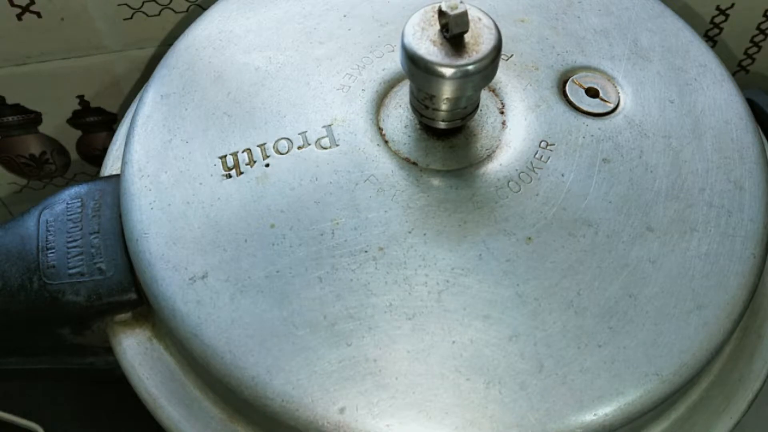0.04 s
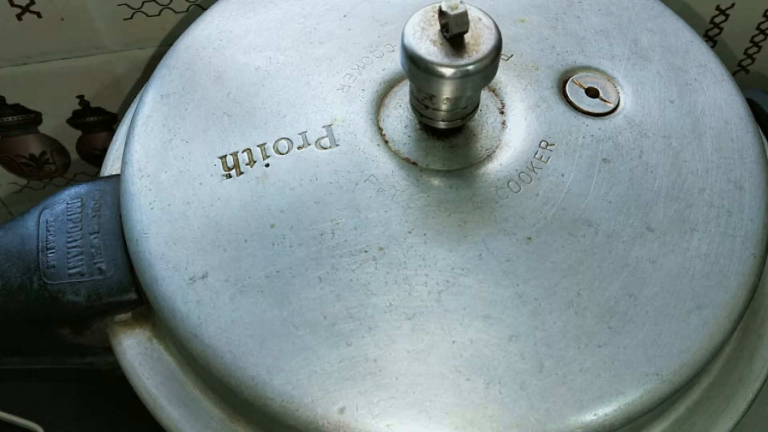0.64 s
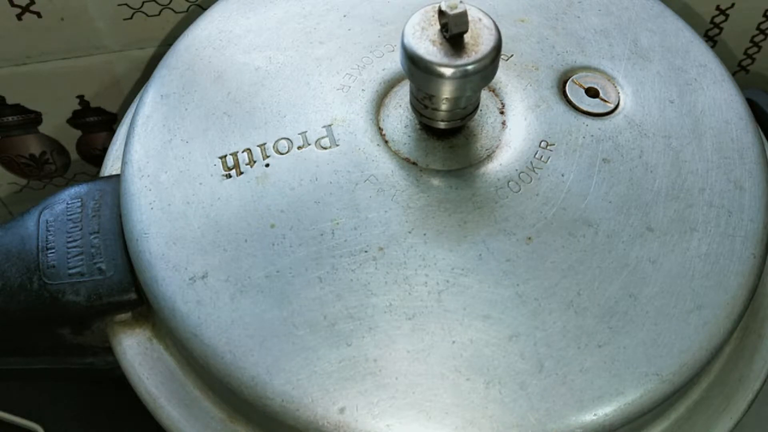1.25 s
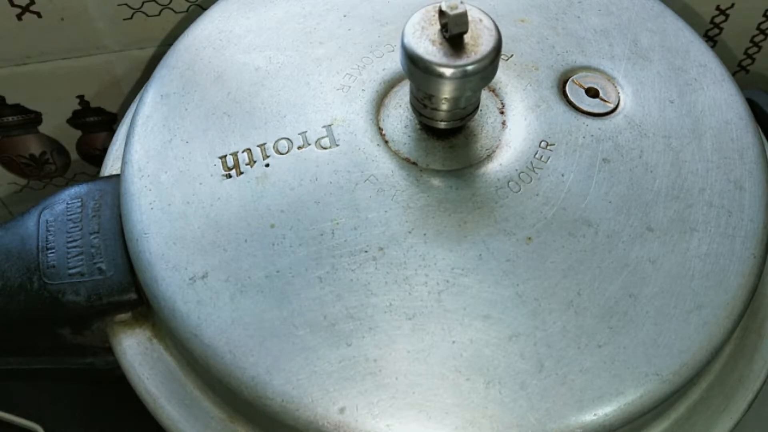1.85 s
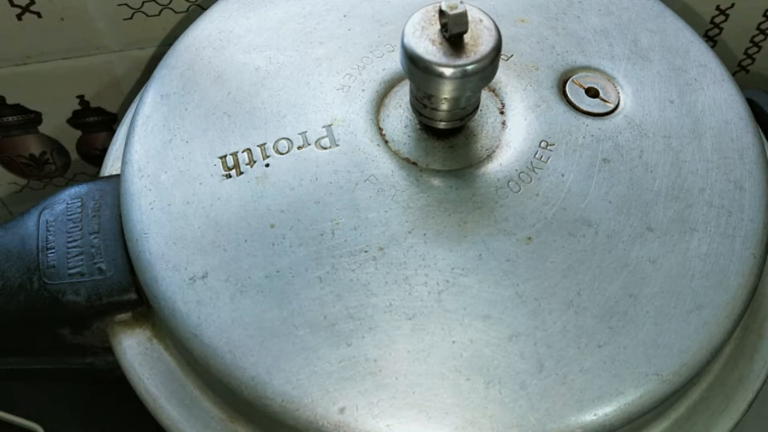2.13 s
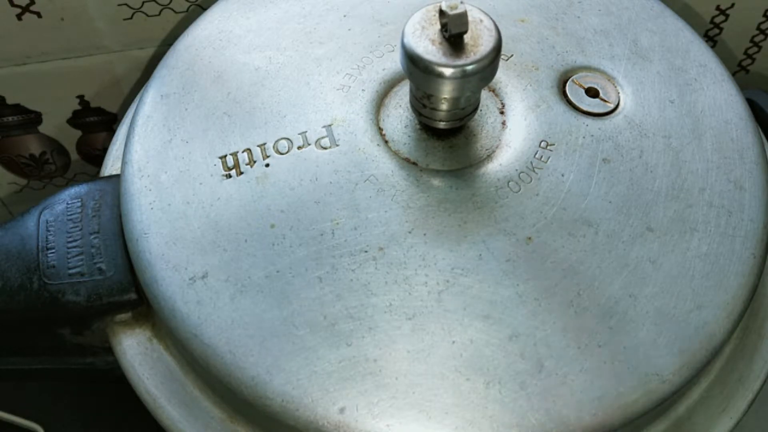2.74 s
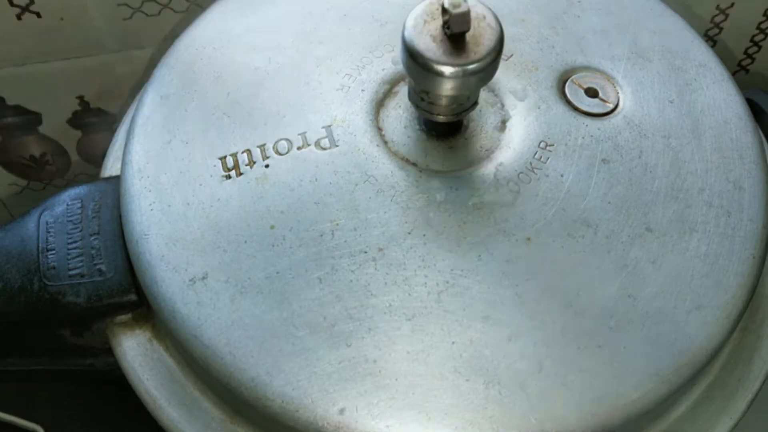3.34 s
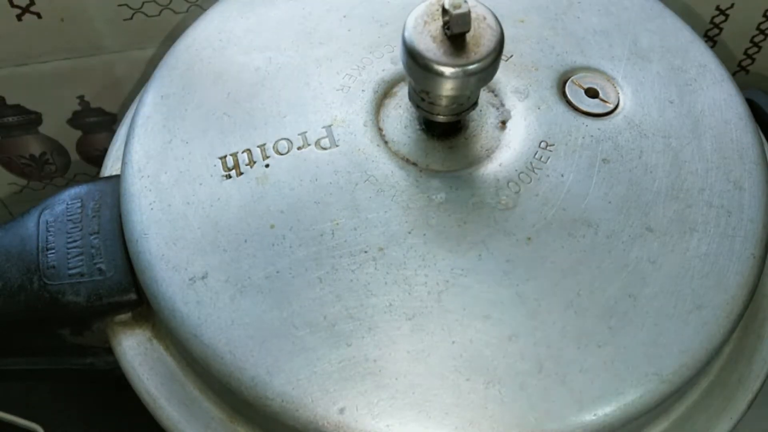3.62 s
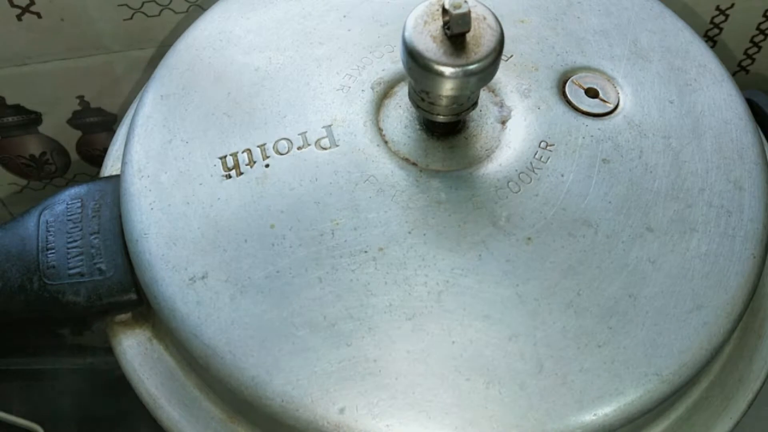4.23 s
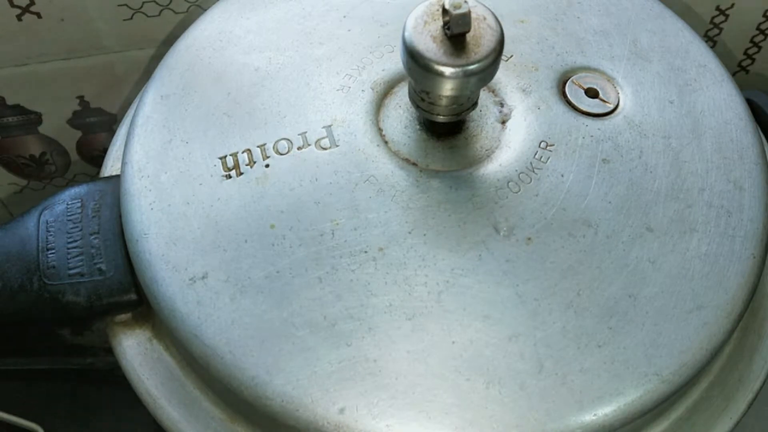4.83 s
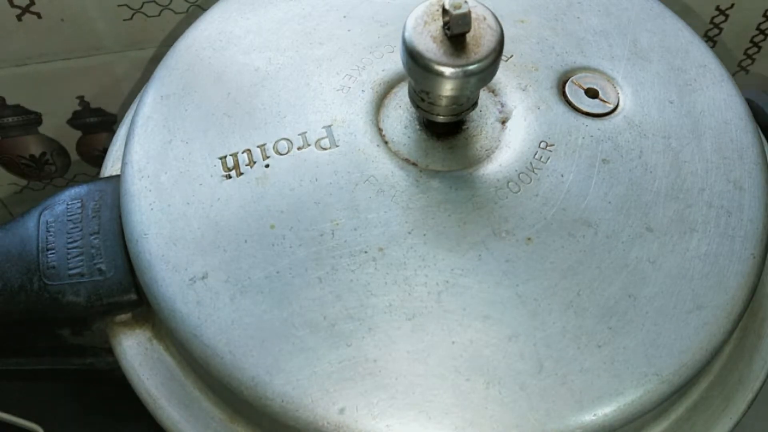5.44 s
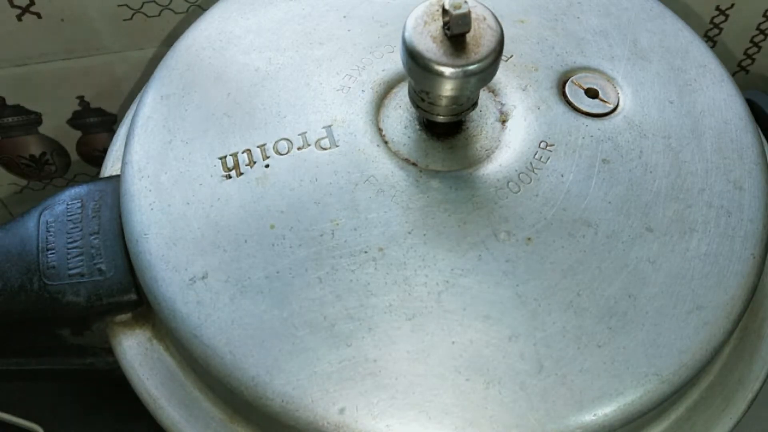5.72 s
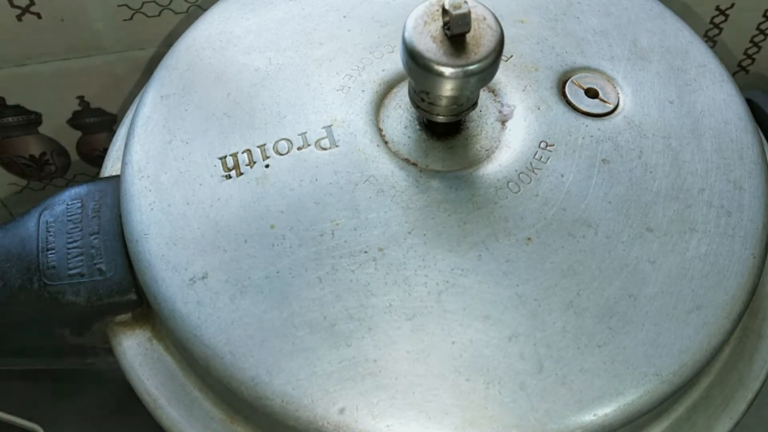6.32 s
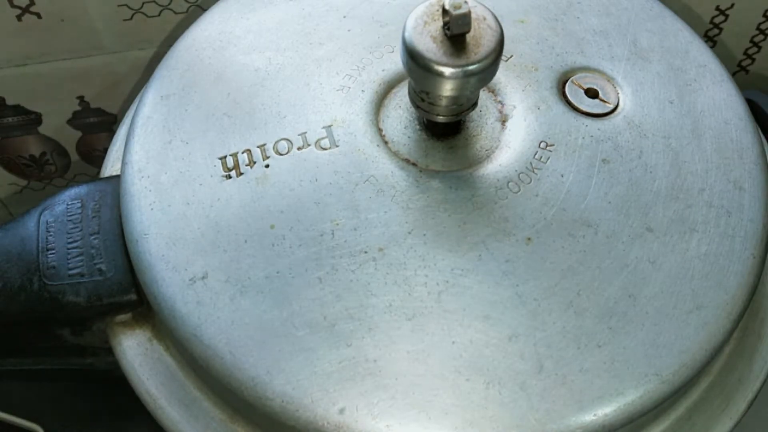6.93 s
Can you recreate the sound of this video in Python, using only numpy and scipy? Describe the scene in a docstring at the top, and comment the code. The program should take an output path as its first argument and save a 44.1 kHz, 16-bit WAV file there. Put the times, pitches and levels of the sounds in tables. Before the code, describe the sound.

A pressure cooker hisses thinly and sputters, then blasts a loud, steady jet of steam that buffets the microphone.

```python
"""A thin, spurting hiss that jumps to a loud, steady jet: a pressure cooker, heard from just above its lid.
Steam seeps from under the rocking weight valve and sputters through water at the seat; then the weight
lifts and the jet blows out through the resonances of valve and lid. The blast buffets the two
microphone ports, which pop one at a time. A small kitchen reflects the hiss; the stove rumbles faintly."""
import sys
import numpy as np
from scipy import signal
from scipy.fft import rfft, irfft
from scipy.io import wavfile
from scipy.ndimage import uniform_filter1d

SR = 44100
rng = np.random.default_rng(int(sys.argv[2]) if len(sys.argv) > 2 else 0)


def unload_wav(signal):
    """Save mono or channel-first audio to the path in sys.argv[1] as 16-bit WAV at rate SR, clipped to [-1, 1]."""
    wavfile.write(
        sys.argv[1],
        SR,
        np.round(np.clip(np.atleast_2d(signal).T, -1, 1) * 32767).astype(np.int16),
    )


N = 316197
T = np.arange(N) / SR
HZ = np.fft.rfftfreq(N, 1 / SR)
LIFT_S = 3.3768  # the weight leaves its seat
TOP_HZ = 15760


def gain_of(db):
    """Decibels to amplitude."""
    return 10 ** (np.asarray(db) / 20)


def unit_rms(x):
    """Scales to rms 1."""
    return x / np.sqrt(np.mean(x ** 2) + 1e-20)


def curve(points):
    """An EQ curve in dB: joins rows (f/Hz, level/dB) on a log-frequency axis."""
    hz, db = np.transpose(points)
    return np.interp(np.log(HZ + 1), np.log(hz + 1), db)


def bells(rings):
    """Resonances as a bell EQ in dB, from rows (f/Hz, width/Hz, gain/dB)."""
    return sum(db / (1 + (2 * (HZ - hz) / width) ** 2) for hz, width, db in rings)


def noise(colour_db):
    """Noise of rms 1 with the given spectrum."""
    return unit_rms(irfft(rfft(rng.standard_normal(N)) * gain_of(colour_db), N))


def wander(rate_hz, hop=64):
    """Random modulation of rms 1, from about 2 Hz up to the given rate."""
    t = T[::hop]
    hz = np.fft.rfftfreq(len(t), hop / SR) + 1e-3
    rolloff = np.sqrt((1 + (hz / rate_hz) ** 4) * (1 + (2 / hz) ** 4))
    slow = irfft(rfft(rng.standard_normal(len(t))) / rolloff, len(t))
    return np.interp(T, t, unit_rms(slow))


def bump(s, half_length_s):
    """A smooth rise to 1 at time s, and back."""
    return np.exp(-((T - s) / half_length_s) ** 2)


def opening(rise_s=0.001):
    """The gap under the weight: 0 seated, 1 lifted."""
    return np.clip((T - LIFT_S) / rise_s + .5, 0, 1)


def stove(level_db=-61., stereo_width=0.3):
    """A bed of faint low rumble, nearly alike at both ports."""
    # colour of the rumble: f/Hz, level/dB
    colour = [(20, -5), (50, -6), (88, 0), (170, -5), (230, 0), (400, 0), (700, -6.5), (1500, -6),
              (5000, -36)]
    # resonances of the stove: f/Hz, width/Hz, gain/dB
    rings = [(89, 28, 9.5), (124, 15, 6.1), (215.6, 16, 10), (420, 9.1, 11)]
    mid, side = (noise(curve(colour) + bells(rings)) for _ in range(2))
    return gain_of(level_db) * (mid + stereo_width * side * np.array([[1], [-1]]))


def draught(gusts, level_db=-37.5, slacken_db=6.5, slacken_s=3.5, swirl_db=-18.5, swirl_s=0.017):
    """Lumpy wind, unrelated at the two ports: it slackens as the jet blows on and swirls at each gust."""
    # colour of the wind: f/Hz, level/dB
    colour = [(20, -16), (45, -18), (90, 4), (160, -3), (300, -6.5), (600, -11.5), (1200, -25), (3000, -57)]
    wind = np.array([unit_rms(noise(curve(colour)) * gain_of(3.5 * wander(39))) for _ in range(2)])
    between_db = level_db - slacken_db * (np.maximum(T - LIFT_S, 0) / slacken_s) ** 4
    power = np.tile(gain_of(between_db) ** 2, (2, 1))
    for s, db, port in gusts:
        power[int(port > 0)] += gain_of(db + swirl_db) ** 2 * bump(s, swirl_s)
    return wind * np.sqrt(power) * opening()


def weak_gusts(level_db=-20.5, spread_db=3.0, thinning=1.4, count=22):
    """Small gusts hit either port at random, more rarely as the jet blows on: t/s, level/dB, port."""
    jitter, size, side = rng.random((count, 3)).T
    times = LIFT_S + (T[-1] - LIFT_S) * ((np.arange(count) + jitter) / count) ** thinning
    return list(zip(times, level_db + spread_db * (2 * size - 1), np.sign(side - .5)))


def first_gust(level_db=-14.0, hz=950, half_length_s=0.0018, delay_s=0.00344):
    """The first puff from under the weight rattles the left port for a few cycles."""
    hit_s = LIFT_S + delay_s
    rattle = bump(hit_s, half_length_s) * np.sin(2 * np.pi * hz * (T - hit_s))
    return gain_of(level_db) * rattle * np.array([[1], [0]])


def pops(gusts, boost_db=3.5, build_s=0.0027, release_s=0.0019, snap_s=0.000094, lead=0.51, soften=0.58):
    """Pressure builds at a port, snaps to the other sign and leaks away; weak gusts turn more softly."""
    t = np.arange(-SR // 40, SR // 40) / SR
    strongest_db = max(db for _, db, _ in gusts)
    out = np.zeros((2, N))
    for (s, db, port), sign in zip(gusts, rng.choice([-1, 1], len(gusts))):
        snapped = .5 + .5 * np.tanh(t / snap_s * gain_of(soften * (db - strongest_db)))
        build = lead * (1 - snapped) * np.exp(-abs(t) / build_s)
        release = snapped * np.exp(-abs(t) / release_s)
        slot = out[int(port > 0), round((s + t[0]) * SR):][:len(t)]
        slot += sign * gain_of(db + boost_db) * (release - build)[:len(slot)]
    return out


def room_envelope(strength, early_s=0.003, t60_s=0.4, tail_share=0.17):
    """Envelope of the reflected sound: quick echoes from lid and wall, then the tail of the room."""
    t = T[:SR // 2]
    early, tail = np.exp(-t / early_s), gain_of(-60 * t / t60_s) ** 2
    decay = (1 - tail_share) * early / early.sum() + tail_share * tail / tail.sum()
    power = signal.fftconvolve(strength ** 2, decay)
    return np.sqrt(abs(power[:N]))


def eddies(hiss, shake_db, band_db, flicker_db, rate_hz, bands=9):
    """Turbulence shakes the hiss and broad bands of it; a fine random narrow-band flicker adds grain."""
    hz, frame_s, spectra = signal.stft(hiss, SR, nperseg=256)
    band_position = np.minimum(hz / TOP_HZ, 1) * (bands - 1)
    band_weights = np.maximum(1 - abs(band_position[:, None] - np.arange(bands)), 0)
    shake = np.array([np.interp(frame_s, T, wander(rate_hz)) for _ in range(bands + 1)])
    flicker = unit_rms(uniform_filter1d(rng.standard_normal(spectra.shape[1:]), size=14, axis=1))
    spectra *= gain_of(shake_db * shake[0] + band_db * band_weights @ shake[1:] + flicker_db * flicker)
    return unit_rms(signal.istft(spectra, SR, nperseg=256)[1][:, :N])


def steam(colour_db, strength, shake_db, band_db, flicker_db, rate_hz, lag_s=.000081, ripple_db=3.0):
    """Hiss in the room: the direct sound hits the right port first; each port has its own echoes."""
    # the kitchen's reflected sound against the direct: f/Hz, level/dB
    kitchen_wet = [(300, 4.5), (2500, 1), (4000, 4.5), (5500, 6), (8500, 5.5), (11500, -2.5), (14500, 11)]
    # balance of the ports, left minus right: f/Hz, level/dB
    port_balance = [(500, 1.3), (3000, -0.5), (5300, -0.2), (6500, 0.5), (8000, -0.8), (11500, 1.2),
                    (13200, 1.5), (14500, 3), (15600, 7.5)]
    # standing waves ripple the spectrum differently at each port
    ripples = [unit_rms(uniform_filter1d(rng.standard_normal(len(HZ)), size=400)) for _ in range(2)]
    paths = np.array([noise(colour_db)] + [noise(colour_db + ripple_db * ripple) for ripple in ripples])
    paths = eddies(paths, shake_db, band_db, flicker_db, rate_hz)
    direct = rfft(paths[0] * strength) * np.exp(-2j * np.pi * HZ * np.array([[lag_s], [0]]))
    echoes = rfft(paths[1:] * room_envelope(strength))
    wet = gain_of(curve(kitchen_wet))
    balance = gain_of(curve(port_balance) * np.array([[.5], [-.5]]))
    return irfft((direct + wet * echoes) / np.sqrt(1 + wet ** 2) * balance, N)


def sputter(level_db=-55.5, centre_hz=2750, width_hz=1300, wet_s=0.77, dry_s=2.94, fade_s=0.2):
    """Water gathers at the seat and breaks part of the leak into brief, lower chirps, until blown away."""
    colour_db = -20 * np.log10(1 + (2 * (HZ - centre_hz) / width_hz) ** 2)
    wetness = (1 + np.tanh((T - wet_s) / fade_s)) / 2 * (1 - np.tanh((T - dry_s) / fade_s)) / 2
    strength = gain_of(level_db) * wetness * (1 - opening())
    return steam(colour_db, strength, shake_db=2.0, band_db=2.8, flicker_db=3.5, rate_hz=33)


def rocking(start_s=1.74, rate_hz=11.55, depth_db=2):
    """Tremolo in dB: near lifting pressure the weight rocks, then steadies as it starts to float."""
    progress = np.clip((T - start_s) / (LIFT_S - start_s), 0, 1)
    return depth_db * np.sin(np.pi * progress) * np.cos(2 * np.pi * rate_hz * (T - start_s))


def leak(seep_db=-41, swell_db=3.5, swell_s=0.37, hollow_hz=5500, hollow_width_hz=1500):
    """A thin hiss seeps past the seated weight, swelling as it tips or rocks and just before it lifts."""
    # spurts as the weight tips: t/s, rise/dB, half length/s
    spurts = [(0.376, 5, 0.057), (0.683, 6, 0.064), (0.97, 2, 0.076), (1.16, 3.5, 0.025),
              (1.446, 3.3, 0.025), (1.675, 3.8, 0.034), (1.771, 2, 0.019)]
    # colour of the leak, peaking where the hollow of the weight rings: f/Hz, level/dB
    colour = [(500, -22), (1200, -20.5), (2800, -14.5), (3900, -14.5), (4700, -11), (5250, -2.5),
              (5750, -1.5), (6600, -13), (9000, -17), (12200, -22), (14000, -14), (15700, -17.5)]
    seated_s = np.minimum(T, LIFT_S)
    spurts_db = sum(db * bump(s, half_length) for s, db, half_length in spurts)
    swell = np.exp((seated_s - LIFT_S) / swell_s)
    strength = gain_of(seep_db + swell_db * swell + spurts_db + rocking()) * (1 - opening())
    colour_db = curve(colour) - 10 * np.log10(1 + (350 / (HZ + 1)) ** 4)  # low cut at 350 Hz
    hiss = steam(colour_db, strength, shake_db=0.67, band_db=.5, flicker_db=2.0, rate_hz=31)
    ring = irfft(rfft(hiss) * np.exp(-(2 * (HZ - hollow_hz) / hollow_width_hz) ** 2), N)
    ring_db = -1.1 + 1.3 * seated_s  # the hollow rings harder as the pressure builds
    return hiss + ring * (gain_of(ring_db) - 1)


def jet(level_db=-13, surge_db=2.5, surge_s=0.18, dip_s=6.47, dip_db=-2.5):
    """The weight lifts: a turbulent jet surges, settles and holds."""
    # colour of the open jet: f/Hz, level/dB
    colour = [(100, -23), (1300, -18), (2200, -13.5), (3000, -8.5), (3500, -7.5), (4000, -10), (5150, -1.5),
              (5750, -0.5), (6600, -4), (7400, -9), (11500, -8), (13200, -11), (14600, -3), (15700, -8)]
    # narrow resonances of valve and lid: f/Hz, width/Hz, gain/dB
    rings = [(4335, 70, 2), (5150, 50, 2.5), (5515, 35, 1.8), (5761, 45, 2), (6196, 35, 2.2),
             (6323, 35, 4.5), (6653, 35, 2.5), (6985, 40, 3.5), (7074, 45, 2.5)]
    surge = np.exp(-np.maximum(T - LIFT_S, 0) / surge_s)
    dip = bump(dip_s, half_length_s=0.035)  # the hiss dips briefly just after one strong microphone pop
    strength = gain_of(level_db + surge_db * surge + dip_db * dip) * opening()
    colour_db = curve(colour) + bells(rings)
    hiss = steam(colour_db, strength, shake_db=0.4, band_db=0.22, flicker_db=1.52, rate_hz=20)
    notch_db = bells([(3850, 150, -5.0)])
    return irfft(rfft(hiss) * gain_of(notch_db), N)


def scene():
    """Steam in the kitchen, over the stove, with its blast on the microphone."""
    # strong gusts on the microphone: t/s, relative level/dB, port (-1 left, 1 right)
    strong_gusts = [(3.382, -11, -1), (3.394, -8.5, -1), (3.422, -10.5, -1), (3.5082, -14.5, -1),
                    (3.5453, -10.5, -1), (3.5596, -12.5, 1), (3.5989, -11.5, -1), (3.6759, -12.5, -1),
                    (3.6836, -11.5, -1), (3.884, -10, -1), (3.9724, -14, 1), (4.2474, -17, 1),
                    (4.3953, -15, 1), (4.4715, -13.5, 1), (4.663, -16.5, 1), (4.8811, -14, -1),
                    (4.897, -13.5, 1), (5.006, -14, 1), (5.4375, -16.5, 1), (5.523, -12, 1),
                    (5.8392, -14.5, 1), (6.0202, -13.5, -1), (6.1147, -14, 1), (6.2641, -14, 1),
                    (6.4446, -12.5, 1), (7.0059, -12.9, -1), (7.016, -11, -1)]
    cooker = leak() + sputter() + jet() + stove()
    gusts = strong_gusts + weak_gusts()
    return cooker + draught(gusts) + first_gust() + pops(gusts)


def record(dry, duck=0.95, threshold=.08, recover_s=0.083, low_cut_hz=45):
    """Microphone chain: low cut, gain control that dips after each low thump, soft clip, band limit."""
    heard = signal.sosfilt(signal.butter(1, low_cut_hz, "high", fs=SR, output="sos"), dry)
    thumps = abs(signal.sosfilt(signal.butter(2, 500, fs=SR, output="sos"), heard)).max(0)
    # peak follower: instant attack, exponential release
    held = np.exp(np.maximum.accumulate(np.log(thumps + 1e-9) + T / recover_s) - T / recover_s)
    ducked = heard / (1 + duck * uniform_filter1d(np.maximum(held - threshold, 0), size=90))
    clipped = ducked / (1 + ducked ** 6) ** (1 / 6)
    band_limit = signal.firwin(1023, TOP_HZ, window=("kaiser", 8), fs=SR)
    return signal.oaconvolve(clipped, band_limit[None], "same")


dry = scene()
out = record(dry)
unload_wav(out)
```